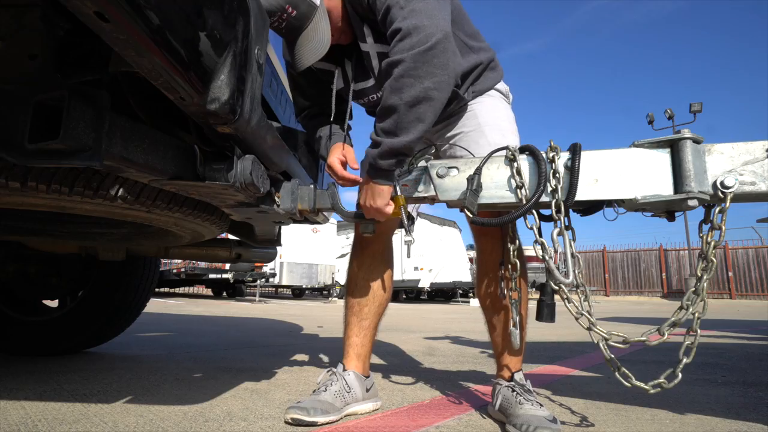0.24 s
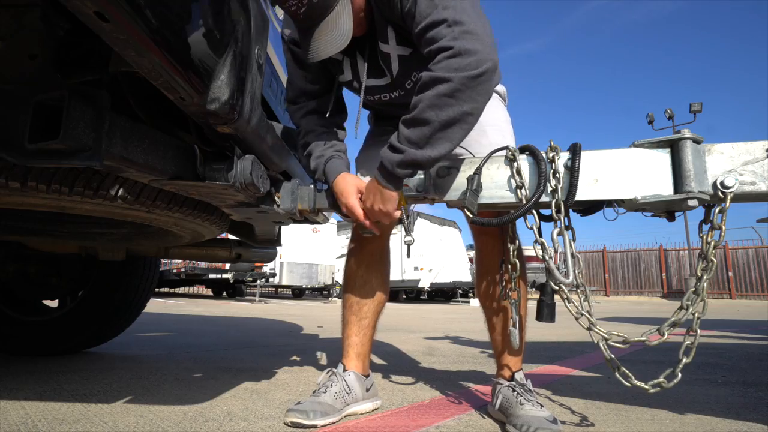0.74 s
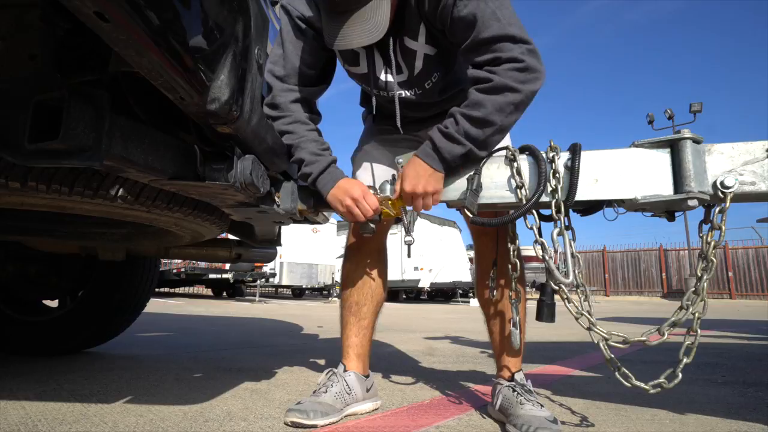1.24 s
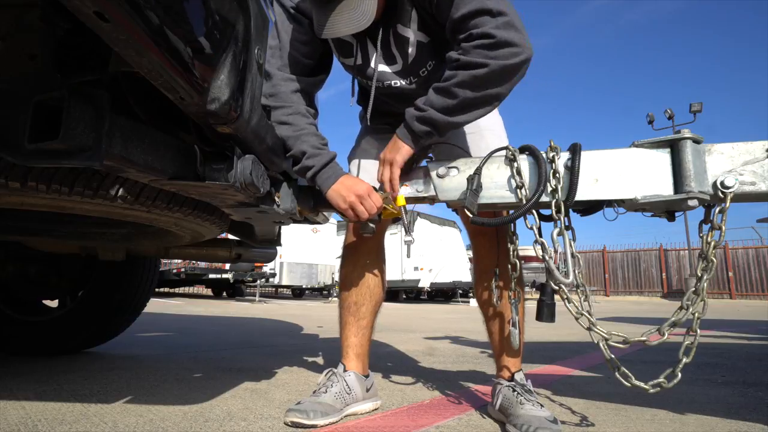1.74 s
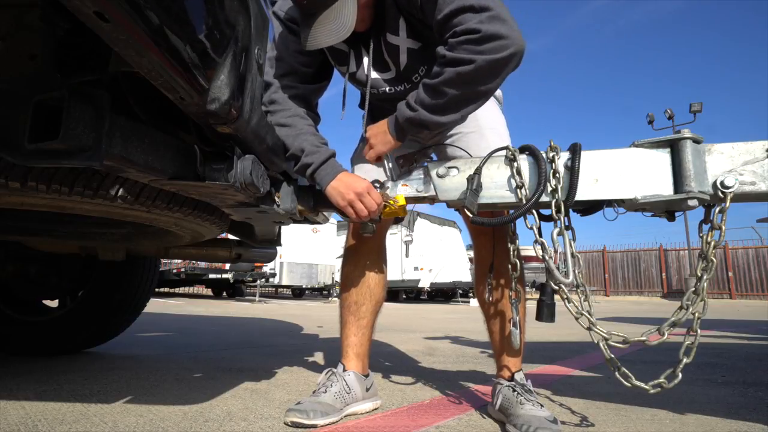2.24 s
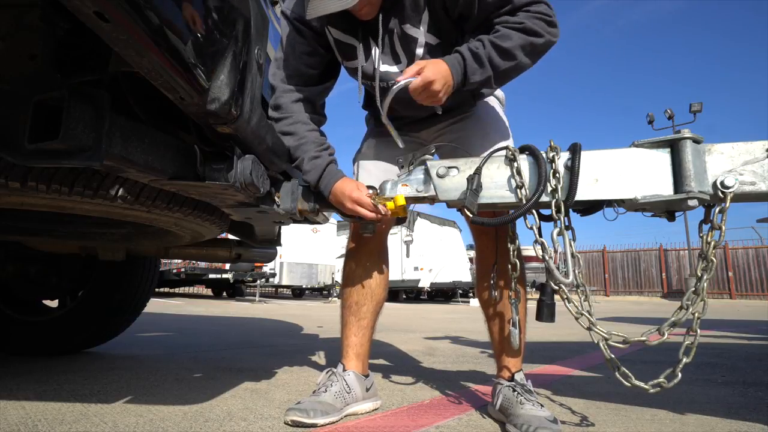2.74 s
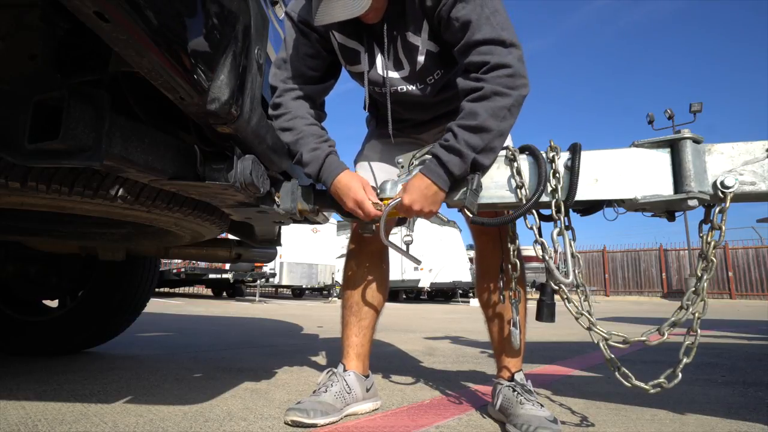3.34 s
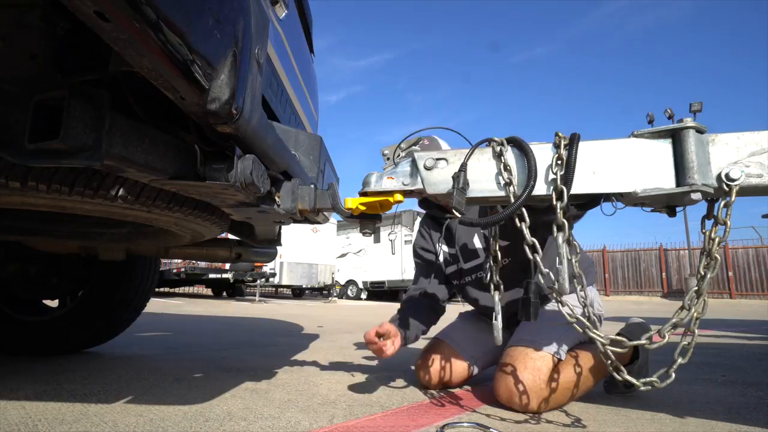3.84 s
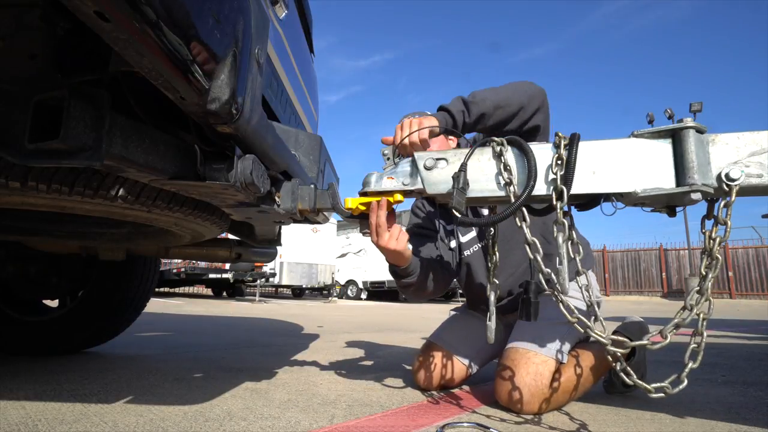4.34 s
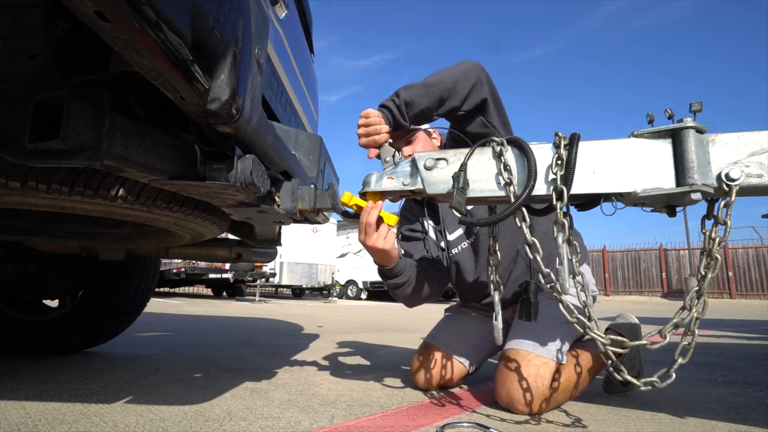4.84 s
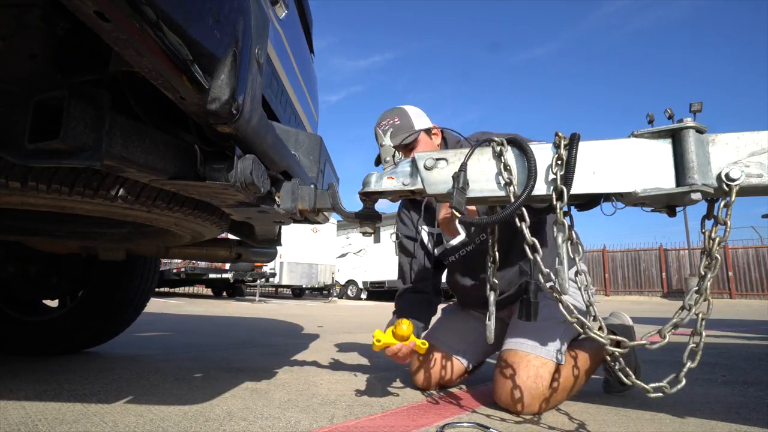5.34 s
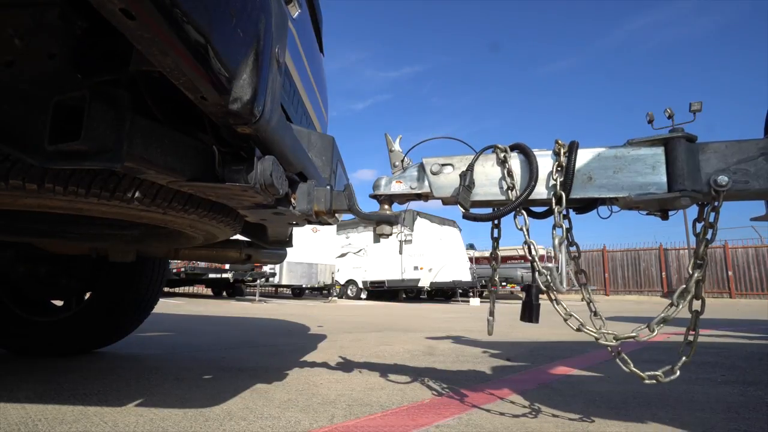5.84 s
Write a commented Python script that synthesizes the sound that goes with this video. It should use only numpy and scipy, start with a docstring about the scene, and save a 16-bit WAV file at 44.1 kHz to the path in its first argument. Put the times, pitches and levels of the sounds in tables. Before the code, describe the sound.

In a quiet open lot, metal hardware clinks and scrapes, a lever cracks and rings, a stuck lock shrieks loose, and a motor idles.

```python
"""In an open parking lot, a steel lock is worked out of a trailer coupler.
Keys and chain links jingle as bursts of noise and ringing modes; dragged steel grinds in over a thousand slips a second.
The coupler's latch snaps up as a crack, a clack and a long ring, then the lock squeals free in wobbling tones.
Light wind and far traffic are coloured noise; an engine of tones and noise idles nearby
for a moment at the start and again at the end."""
import sys
import numpy as np
from scipy import signal
from scipy.io import wavfile

SR = 44100
rng = np.random.default_rng(int(sys.argv[2]) if len(sys.argv) > 2 else 0)


def store_wav(level_fs):
    """Save 16-bit WAV to argv[1]."""
    pcm = np.round(np.clip(np.atleast_2d(level_fs), -1, 1) * 32767)
    wavfile.write(sys.argv[1], SR, pcm.T.astype(np.int16))


N = 268811
TIME = np.arange(N) / SR   # seconds
EDGES = np.geomspace(18, 17000, 26)   # edges of the noise bands in Hz

# How long coupler and car body ring on. Each row: frequency in Hz, time to fall by 60 dB in seconds.
TAIL = [(100, .36), (700, .24), (2000, .13), (4000, .085), (12000, .075)]


def from_db(db):
    """Turn decibels into gain."""
    return 10 ** (np.asarray(db) / 20)


def rms_one(x):
    """Scale to an rms of 1."""
    return x / np.sqrt(np.mean(x ** 2) + 1e-20)


def in_time(rows):
    """Turn rows that start with a time into one curve per further column."""
    s, *columns = np.transpose(rows)
    return [np.interp(TIME, s, column) for column in columns]


def at_hz(points, hz):
    """Read a table of (Hz, value) between its points, on a log-frequency axis."""
    points_hz, values = np.array(points).T
    return np.interp(np.log(hz), np.log(points_hz), values)


def drift(rate):
    """Wander at random with rms 1, with `rate` new targets a second."""
    knots = rng.standard_normal(int(N / SR * rate) + 3)
    return rms_one(np.interp(TIME * rate, np.arange(len(knots)), knots))


def clicks(times, sizes):
    """Place single-sample impulses at the given seconds."""
    out = np.zeros(N)
    out[np.clip(np.round(times * SR).astype(int), 0, N - 1)] = sizes
    return out + 1e-18


def bouncing(s, gap_s, fall_db, count):
    """Let each touch rebound at uneven gaps; gives a function from the touches' dB to force."""
    gaps = gap_s * rng.uniform(.3, 1.7, (len(s), count))
    times = s[:, None] + np.cumsum(gaps, axis=1) - gaps[:, :1]
    return lambda db: clicks(times, from_db(db[:, None] + fall_db * np.arange(count)))


def stroke(s, length, db, attack_s, release_s):
    """Gain of one stroke: a quick attack, a level hold, then a fall of 60 dB in release_s."""
    t = TIME - s
    fall = np.clip((t - length) / release_s, 0, 3)
    return np.clip(t / attack_s, 0, 1) * from_db(db - 60 * fall)


def ring(force, hz, t60):
    """A resonance: a unit click sets off a sine of height 1 that falls 60 dB in t60 seconds."""
    r = from_db(-60 / (t60 * SR))
    w = 2 * np.pi * hz / SR
    return signal.lfilter([0, np.sin(w)], [1, -2 * r * np.cos(w), r * r], force)


def dying(force, t60):
    """Envelope of the energy that each click leaves behind, falling 60 dB in t60 seconds."""
    keep = from_db(-120 / (t60 * SR))   # squared, so twice the dB
    return np.sqrt(signal.lfilter([1], [1, -keep], force ** 2))


def coloured(spectrum, envelope=lambda hz: 1):
    """Noise in narrow bands, each driven by envelope(Hz); rms 1 where the envelope is 1."""
    white = rng.standard_normal((2, N))
    out, power = 0, 0
    for k, (low, high) in enumerate(zip(EDGES, EDGES[1:])):
        hz = np.sqrt(low * high)
        gain = from_db(at_hz(spectrum, hz))
        band = signal.butter(2, [low, high], "band", fs=SR, output="sos")
        # neighbouring bands take turns with two separate noises
        out = out + gain * signal.sosfilt(band, white[k % 2] * envelope(hz))
        power += gain ** 2 * (high - low) / (SR / 2)
    return out / np.sqrt(power)


def open_air(wind_db=-1, gust_db=4.0, traffic_db=-57, waver_db=1):
    """Lumpy low wind on the microphone over the nearly steady wash of far traffic."""
    # Strength of the wind before wind_db and its random gusts. Each row: time in seconds, level in dB.
    strength = [(0.12, -62), (0.61, -51.5), (1.14, -62), (2.23, -51.5), (2.35, -41), (2.64, -53),
                (2.82, -40.5), (3.45, -59), (3.84, -48), (3.93, -72), (4.68, -67), (4.95, -55),
                (5.18, -67.5), (5.42, -58.5)]
    # Colour of the wind. Each row: frequency in Hz, density in dB per Hz.
    wind_colour = [(8.8, -32), (15, 10), (32, 4.5), (49, -6.5), (124, -9), (160, -30), (210, -53),
                   (350, -120)]
    # Colour of the traffic. Each row: frequency in Hz, density in dB per Hz.
    traffic_colour = [(35, -34.5), (60, -4.5), (98, -12.5), (233, -14), (363, -22.5), (427, -21),
                      (785, -25), (1280, -30), (2770, -39), (3420, -44), (4120, -44.5), (8120, -55),
                      (12400, -54), (16000, -63.5)]
    wind, = in_time(strength)
    gusts = from_db(wind + wind_db + gust_db * drift(19)) * coloured(wind_colour)
    wash = coloured(traffic_colour, lambda hz: from_db(waver_db * drift(29)))
    return gusts + from_db(traffic_db) * wash


def engine(wander=0.0065, throb_db=2.0, fade_s=0.002):
    """Wavering exhaust orders and a belt whine in fan and valve noise; each stretch starts and stops abruptly."""
    # The two stretches of idling. Each row: start in seconds, end in seconds, noise level in dB, gain of tones in dB.
    idles = [(0, 0.088, -42, -9.5), (5.456, 6.097, -37, -1.5)]
    # Exhaust orders and belt whine. Each row: frequency in Hz, level in dB before the gain of tones.
    engine_tones = [(118.4, -43), (156, -52), (181.6, -52), (465, -68), (629, -51), (835, -55), (1050, -61)]
    # Wash of the first stretch. Each row: frequency in Hz, density in dB per Hz.
    opening_colour = [(15, -35), (25, 0), (108, -9), (285, -3.5), (354, 1), (560, -6), (988, -5),
                      (3820, -23.5), (16000, -55)]
    # Noise of the second stretch. Each row: frequency in Hz, density in dB per Hz.
    noise_colour = [(15, -36), (25, -10), (114, -0.5), (326, -16.5), (463, -15), (503, -18.5), (641, -12),
                    (775, -19), (863, -18), (1940, -28), (3340, -30.5), (3620, -32), (5430, -43.5),
                    (7510, -48.5), (16000, -74)]
    tones = 0
    for hz, db in engine_tones:
        level = np.sqrt(2) * from_db(db + 2 * drift(6.7))
        cycles = hz * np.cumsum(1 + wander * drift(15)) / SR
        tones = tones + level * np.sin(2 * np.pi * cycles)
    opening = coloured(opening_colour)
    throbbing = coloured(noise_colour, lambda hz: from_db(throb_db * drift(40)))
    out = 0
    for (start, end, noise_db, tones_db), wash in zip(idles, (opening, throbbing)):
        heard = np.clip(np.minimum(TIME - start, end - TIME) / fade_s, 0, 1)
        out = out + heard * (from_db(noise_db) * wash + from_db(tones_db) * tones)
    return out


def reflections(x, wet_db, t60):
    """Ground and car body throw back a short, dense scatter of echoes."""
    t = TIME[:SR // 3]
    scatter = rng.standard_normal(len(t)) * from_db(-60 * t / t60) * (t > .004)
    return from_db(wet_db) * signal.fftconvolve(x, scatter / np.linalg.norm(scatter))[:N]


def keys(tick_db=-7, tick_t60=0.019, tail_db=-25, tail_t60=0.17, body_db=4, ring_db=-17,
         jingle_db=-10, jingle_ring_db=-19, ping_db=-9, loose_db=5, held_db=-1):
    """Touches tick and ring the keys' modes unevenly; in the jingles small parts slide and chatter."""
    # Clear touches of keys and links, before the balance settings above.
    # Each row: start in seconds, level in dB, share of the lower range (fading out by 9 kHz) in dB, ring in dB.
    clinks = [(0.725, -73.5, 19.5, -18), (0.787, -64.5, 6, -17), (0.908, -61, 16, -25),
              (0.956, -55.5, 10, -13), (0.980, -42, -8, 2.5), (1.0522, -25, -31, -4.5),
              (1.060, -27.5, -35, -3.5), (1.112, -43, -20, -10), (1.145, -50, -14, 4),
              (1.159, -51, 8.5, -12), (1.199, -52, -1, 1), (1.240, -39, -8.5, -30), (1.289, -45.5, -9, -21),
              (1.358, -50.5, -4.5, -7), (1.678, -68, 13, -12), (1.94, -48.5, -1.5, -10),
              (2.647, -48.5, 3, 1), (2.674, -45.5, -1.5, -19), (2.734, -45, -1.5, -10),
              (2.951, -34.5, -8, -9), (3.062, -38.5, -8, -27), (3.162, -46, -11, -13),
              (3.196, -40, -9.5, -13), (3.297, -26.5, -11, 4.5), (3.393, -41.5, 2, -6),
              (3.460, -20, -15, -13), (3.481, -41.5, -23, 14), (3.761, -41.5, -12, -17.5),
              (3.786, -56, 7, -22), (3.834, -56, 3.5, -8), (3.889, -47, -12, -18), (3.960, -51, -9, -17),
              (4.2406, -38, -11, -25), (4.293, -46.5, -8, -14)]
    # Small parts slide over each other. Each row: start in seconds, length in seconds, level in dB before jingle_db.
    jingles = [(0.919, 0.23, -57), (1.032, 0.071, -50.5), (1.25, 0.069, -73), (2.61, 0.18, -62),
               (2.94, 0.015, -42.5), (3.201, 0.13, -46), (3.358, 0.047, -49), (3.456, 0.1, -51),
               (3.675, 0.073, -50.5), (3.825, 0.023, -71)]
    # Colour of the ticks. Each row: frequency in Hz, density in dB per Hz.
    clink_colour = [(530, -37), (900, 6.5), (1600, -5.5), (2660, 8.5), (3430, 3), (5410, 5), (8760, -14),
                    (11600, -10), (13000, -18), (16000, -14)]
    # Modes of the first bunch of keys. Each row: frequency in Hz, level in dB, time to fall by 60 dB in seconds.
    loose_modes = [(4305, -2, .19), (4335, -6, .15), (5507, -12, .1), (6837, -4, .08), (7542, -5, .1),
                   (11193, -1, .15), (11632, 0, .12), (12040, -4, .07), (13630, -2, .1), (14210, -11, .1)]
    # Modes of the keys hanging in the lock, with the same columns: Hz, dB, seconds.
    held_modes = [(2720, -7, .12), (3620, 0, .09), (4560, -6, .06), (5560, -3, .08), (6920, -3, .09),
                  (9570, -5, .14), (11000, -10, .07), (12000, -5, .1), (13300, -8, .08), (15700, -8, .1)]
    key_change_s = 2.9   # from here on the keys hanging in the lock are the ones that ring
    chatter_per_s, chatter_spread_db = 820, 6.5
    attack_s, release_s = 0.0068, 0.039
    ping_share, ping_t60 = .07, 0.026   # share of the pings that one contact sounds, and their ring in seconds

    s, db, low_db, rings_db = np.transpose(clinks)
    touch = bouncing(s, gap_s=0.0048, fall_db=-8.0, count=3)
    hits = rng.random(N) < chatter_per_s / SR
    grains = hits * from_db(chatter_spread_db * np.clip(rng.standard_normal(N), -2, 1.7))
    handling = sum(stroke(*row, attack_s, release_s) for row in jingles)
    chatter = grains * from_db(jingle_db) * handling

    def envelope(hz):
        low = at_hz([(4500, 1), (9000, 0)], hz)
        force = chatter + touch(db + low * (low_db + body_db))
        return from_db(tick_db) * dying(force, tick_t60) + from_db(tail_db) * dying(force, tail_t60)

    out = coloured(clink_colour, envelope)
    bunches = ((loose_modes, loose_db, TIME < key_change_s), (held_modes, held_db, TIME >= key_change_s))
    for modes, bunch_db, handled in bunches:
        for hz, mode_db, t60 in modes:
            uneven_db = rng.normal(0, 2, len(s))
            force = clicks(s, from_db(db + rings_db + ring_db + uneven_db))
            force += from_db(jingle_ring_db) * chatter * rng.standard_normal(N)
            out += from_db(mode_db + bunch_db) * ring(force * handled + 1e-18, hz, t60)
    # rings and links held in the fingers: every contact finds some brief pitches of its own
    contacts = chatter + touch(db - 14.5)
    for hz in np.linspace(2400, 15500, 44) * rng.uniform(.97, 1.03, 44):
        chosen = contacts * (rng.random(N) < ping_share) + 1e-18
        out += from_db(ping_db) * ring(chosen, hz, ping_t60)
    return out


def coupler(x, direct_db=-3, ring_db=2, width_share=0.41):
    """The hollow steel coupler adds its resonances to whatever shakes it; all peak equally at ring_db."""
    # Hollow coupler. Each row: frequency in Hz, width in Hz before width_share narrows it, an unused number.
    hollow = [(555, 31, -4), (733, 34, -2), (1933, 44, -3), (2340, 42, -5), (2770, 330, -2), (3640, 26, -6),
              (4300, 190, 0), (5110, 100, -12), (6400, 450, -19), (8550, 38, -25), (9500, 120, -25),
              (11200, 370, -23), (11100, 92, -21), (11900, 76, -27)]
    # The trailer tongue booms. Each row: frequency in Hz, width in Hz before width_share, an unused number.
    tongue = [(110, 25, 5), (125.9, 37, 3), (391, 25, -4)]
    out = from_db(direct_db) * x
    for hz, width, _ in [*hollow, *tongue]:
        used_width = np.clip(width * width_share, max(12, hz / 100), 160)
        r = np.exp(-np.pi * used_width / SR)
        top = (1 - r * r) / 2 * np.array([1, 0, -1])
        bottom = [1, -2 * r * np.cos(2 * np.pi * hz / SR), r * r]
        out = out + from_db(ring_db) * signal.lfilter(top, bottom, x)
    return out


def knocks(crack_db=-5, crack_t60=.016, tail_db=-17, bass_db=9, treble_db=11, ring_db=2, delay_s=0.0014):
    """Hand-damped blows: a short crack and a choked ring, then the coupler sounds on, longest in the bass."""
    # The lock knocks in the coupler, before the balance settings above; delay_s is added to all start times.
    # Each row: start in seconds, level in dB, bass share in dB, treble share in dB, ring of the lock body in dB.
    blows = [(1.963, -34, -7, -72, -19), (2.054, -24, -6, -62, 1), (2.085, -17.5, -10, -45, -5.5),
             (2.111, -11, -20, -15.5, -10), (2.146, -13.5, -37, -7.5, -2.5), (2.158, -18, -15.5, -30, -16),
             (2.177, -29, -1.5, -36, 1.5), (2.276, -21.5, -28, -17, -9), (4.576, -25, -20, -20, -13),
             (4.715, -9.5, -29.5, -20, -5.5), (4.767, -15.5, -38, -1, -6.5), (4.824, -17.5, -44, 6.5, -7),
             (4.858, -22, -24, 0, -3), (4.907, -15.5, -16, 1, -24.5), (5.065, -19, -21, -3, -14.5),
             (5.531, -23.5, -26, -66, -22)]
    # Colour of the blows. Each row: frequency in Hz, density in dB per Hz.
    knock_colour = [(47, -27), (80, -3.5), (152, -7), (265, -1), (751, 0), (1670, -4.5), (1950, -3.5),
                    (2540, -5), (2780, -2.5), (3790, -8), (4140, -1), (5400, -12.5), (9820, -31.5),
                    (11000, -28), (16000, -39)]
    # The hand-held lock body. Each row: frequency in Hz, level in dB, time to fall by 60 dB in seconds.
    lock_modes = [(2850, -7, .025), (4060, -5, .03), (4230, -3, .035), (4560, -5, .03)]
    s, db, low_db, high_db, lock_db = np.transpose(blows)
    strike = bouncing(s + delay_s, gap_s=.0012, fall_db=-2.5, count=3)

    def envelope(hz):
        low = at_hz([(800, 0.96), (2500, 0.27)], hz)
        high = at_hz([(4500, 0.017), (9000, 1)], hz)
        force = strike(db + low * (low_db + bass_db) + high * (high_db + treble_db))
        return from_db(crack_db) * dying(force, crack_t60) + from_db(tail_db) * dying(force, at_hz(TAIL, hz))

    # the lock is scraped rather than struck cleanly, so a short rough burst drives its modes
    scuff = dying(strike(db + lock_db + ring_db), .012) * rng.standard_normal(N) / np.sqrt(.003 * SR)
    lock = sum(from_db(mode_db) * ring(scuff, hz, t60) for hz, mode_db, t60 in lock_modes)
    lock = signal.sosfilt(signal.butter(4, 5500, fs=SR, output="sos"), lock)   # low-pass
    return coupler(coloured(knock_colour, envelope)) + lock


def grind(drags, colour, slips_per_s, slip_t60, spread_db, level_db, body_db):
    """Dragged steel catches and slips more than a thousand times a second; the bass rings on longer."""
    attack_s, release_s = 0.014, 0.15
    slips = (rng.random(N) < slips_per_s / SR) * from_db(spread_db * rng.standard_normal(N)) + 1e-12
    pressure = sum(stroke(*row, attack_s, release_s) for row in drags)
    force = slips * from_db(level_db) * pressure / np.sqrt(np.mean(dying(slips, slip_t60) ** 2))
    rasp = dying(force, slip_t60)

    def envelope(hz):
        if hz >= 1000:
            return rasp
        return rasp + from_db(body_db) * dying(force, at_hz(TAIL, hz))

    return coloured(colour, envelope)


def twisting():
    """Steel drags on steel in many small slips as the lock is fingered and twisted."""
    # Each row: start in seconds, length in seconds, level in dB before level_db.
    drags = [(0.9, 0.46, -70), (1.855, 0.013, -62.5), (1.958, 0.024, -56), (2.055, 0.12, -38),
             (2.265, .055, -46.5), (3.2, 0.24, -62), (3.83, 0.0088, -62.5)]
    # Colour of the rasp. Each row: frequency in Hz, density in dB per Hz.
    colour = [(41, -36.5), (70, -11.5), (113, -1), (274, -10.5), (483, -5.5), (649, -9), (744, -4.5),
              (1650, -1), (2780, -2), (3820, -1), (4190, -7), (5890, -34), (16000, -45)]
    return grind(drags, colour, slips_per_s=1100, slip_t60=0.01, spread_db=2.5, level_db=2.0, body_db=-10)


def pulling():
    """Steel drags in denser, shorter and more uneven slips as the lock is pulled off."""
    # Each row: start in seconds, length in seconds, level in dB before level_db.
    drags = [(4.18, 0.036, -59), (4.31, 0.025, -66), (4.42, 0.32, -67), (4.635, 0.076, -53),
             (4.712, 0.21, -37), (5.02, 0.055, -59.5)]
    # Colour of the rasp. Each row: frequency in Hz, density in dB per Hz.
    colour = [(41, -29.5), (70, 2.5), (159, -1.5), (256, -9.5), (761, -0.5), (1310, -1.5), (1930, 9),
              (2270, 3), (2910, 3.5), (6590, -16), (7730, -33.5), (11400, -43.5), (16000, -41)]
    return grind(drags, colour, slips_per_s=1600, slip_t60=0.0061, spread_db=5.5, level_db=-1.5, body_db=-7.5)


def squeals(flutter_db=3.5, overtone_db=-11, fall_db=-9):
    """Where the slips lock into step the steel shrieks at an unsteady, gliding pitch, with weaker overtones."""
    # Each row: start in seconds, length in seconds, level in dB, first pitch in Hz, last pitch in Hz.
    shrieks = [(0.883, 0.02, -66, 5400, 5660), (2.311, 0.0071, -41, 5300, 5445),
               (4.688, .018, -52.5, 4600, 4426), (4.705, .017, -27, 4400, 3286),
               (4.729, 0.023, -22, 3207, 3410), (4.792, 0.0359, -21.5, 3315, 3150),
               (4.839, 0.0054, -23.5, 2894, 2910), (5.051, 0.0078, -51.5, 2440, 2470)]
    attack_s, release_s = 0.0015, 0.017
    top_hz = 8000   # the steel radiates little of the squeal above this
    glide = []
    for s, length, _, first, last in shrieks:
        glide += [(s, first), (s + length, last)]
    hz, = in_time(glide)
    level = sum(stroke(s, length, db, attack_s, release_s) for s, length, db, _, _ in shrieks)
    wobble = 1 + .055 * drift(2200) + .04 * drift(250)
    phase = 2 * np.pi * np.cumsum(hz * wobble) / SR
    voice = np.sin(phase)
    for k in range(3):
        voice = voice + from_db(overtone_db + fall_db * k + 3 * drift(300)) * np.sin((k + 2) * phase)
    shriek = level * from_db(flutter_db * np.tanh(drift(500))) * voice
    return signal.sosfilt(signal.butter(4, top_hz, fs=SR, output="sos"), shriek)


def latch(crack_db=-7, crack_t60=0.026, tail_db=-20, ring_db=-8.5, clack_db=5, clack_hz=3040, clack_t60=.024,
          shimmer_db=-35, shimmer_t60=0.24):
    """The lever hits its stop: a crack, a choked clack and the long ring of lever and plate."""
    # Latch blows, before the balance settings above. Each row: start in seconds, level in dB, ring in dB,
    # hard clack in dB, plate modes against the lever's in dB, brightness in dB per octave.
    blows = [(2.261, -49.5, 13, 4, -9.5, -1.5), (2.314, -52.5, 24.5, -5.5, -17.5, -4),
             (2.3719, -6, 9, 0, 3, 1.5), (2.7609, -23, -2, -19, 17, -3.5)]
    # Ringing of the latch. Each row: frequency in Hz, level in dB, time to fall by 60 dB in seconds.
    modes = [(745, -44, .35), (991, -34, .2), (2008, -36, .24), (2159, -31, .24), (2492, -37, .17),
             (3142, -36, .42), (3165, -42, .3), (3331, -20, .11), (3402, -23, .12), (3544, -20, .16),
             (4220, -47, .65), (4588, 2, .14), (4861, -32, .12), (5233, -12, .18), (5892, -28, .17),
             (6691, -28, .1), (7332, -35, .1), (7774, -26, .13), (8093, -37, .22), (10314, -27, .13),
             (12700, -27, .1)]
    # Colour of the crack. Each row: frequency in Hz, density in dB per Hz.
    snap_colour = [(100, -17), (400, -10.5), (900, -2.5), (1300, -6.5), (1800, -0.5), (2400, -4),
                   (3300, -0.5), (4400, -6), (6500, -4), (8500, -14), (12000, -22), (16000, -33)]
    lever_hz = 4400   # the lever's own modes lie above this, the plate's below
    s, db, rings_db, hard_db, plate_db, tilt_db = np.transpose(blows)
    strike = bouncing(s, gap_s=.001, fall_db=-2, count=3)

    def brightness(hz):
        return db + tilt_db * np.log2(max(hz, 500) / clack_hz)

    def envelope(hz):
        force = strike(brightness(hz))
        return from_db(crack_db) * dying(force, crack_t60) + from_db(tail_db) * dying(force, at_hz(TAIL, hz))

    out = coloured(snap_colour, envelope)
    # the clack swells for a moment as the lever seats: a slow ring less a fast one
    seat = clicks(s, from_db(db + hard_db + clack_db))
    out += 2 * (ring(seat, clack_hz, clack_t60) - ring(seat, clack_hz, clack_t60 * .25))
    for hz, mode_db, t60 in modes:
        force = clicks(s, from_db(db + rings_db + ring_db + mode_db + plate_db * (hz < lever_hz)))
        out += rng.choice([-1, 1]) * ring(force, hz, t60)
    # the pressed-steel housing adds a thicket of weak modes that beat against each other
    for hz in np.geomspace(700, 14500, 70) * rng.uniform(.98, 1.02, 70):
        level = from_db(brightness(hz) + shimmer_db + at_hz(snap_colour, hz))
        force = clicks(s, level * rng.standard_normal(len(s)))
        out += ring(force, hz, shimmer_t60 * (3000 / hz) ** .3)   # higher modes die sooner
    return out


def scene():
    """Air and engine lie behind, the hardware is close by."""
    background = open_air() + engine()
    grinding = coupler(twisting() + pulling())
    shriek = squeals()
    echoes = reflections(shriek, wet_db=-6, t60=0.19)
    hardware = keys() + knocks() + grinding + shriek + echoes + latch()
    return (background + hardware)[None]


def record(dry):
    """A limiter ducks just after the loudest blow and recovers; the peak it misses is clipped, the top is cut."""
    limit_db, attack_s, release_db_per_s = -2.5, .0022, 201
    cutoff_hz = 16200
    recovered = release_db_per_s * TIME
    over = np.maximum(20 * np.log10(np.abs(dry[0]) + 1e-9) - limit_db, 0)
    held = np.maximum.accumulate(over + recovered) - recovered   # jumps up, then falls at the release rate
    keep = np.exp(-1 / (attack_s * SR))
    duck_db = signal.lfilter([1 - keep], [1, -keep], held)
    clipped = np.clip(dry * from_db(-duck_db), -1, 1)
    return signal.sosfilt(signal.ellip(10, .2, 80, cutoff_hz, fs=SR, output="sos"), clipped)


dry = scene()
out = record(dry)
store_wav(out)
```